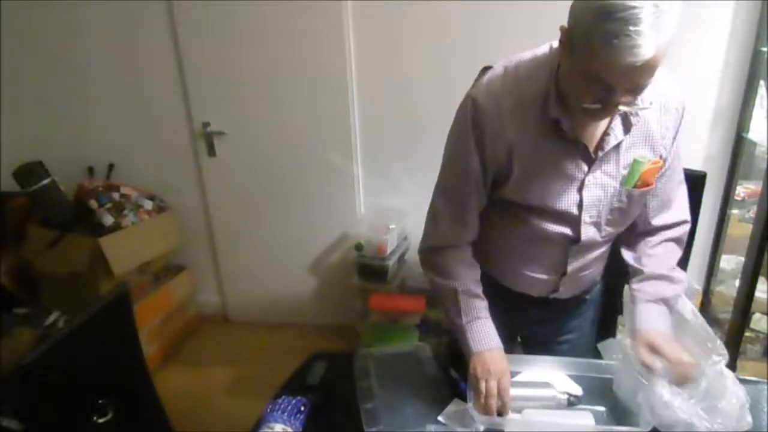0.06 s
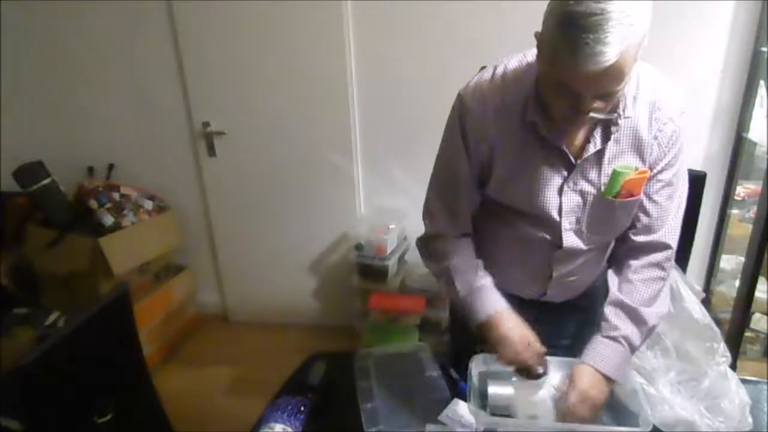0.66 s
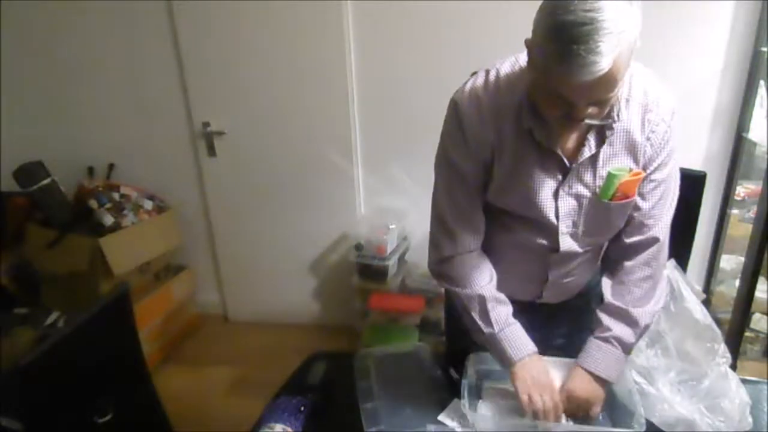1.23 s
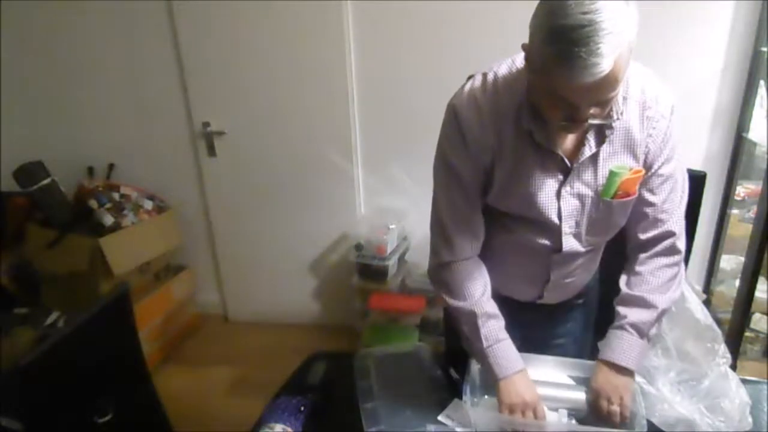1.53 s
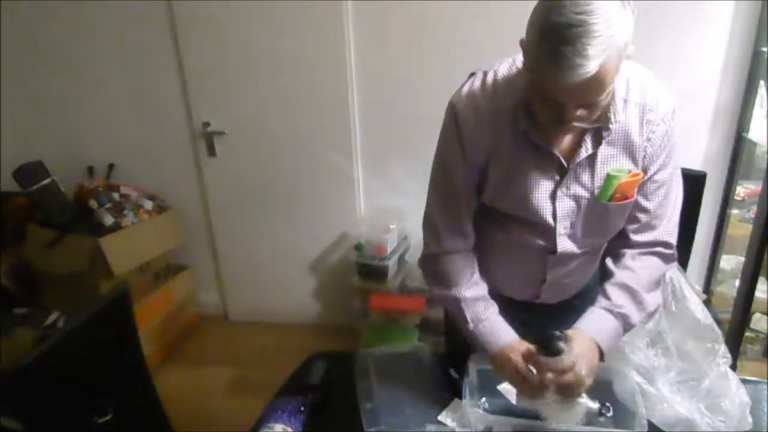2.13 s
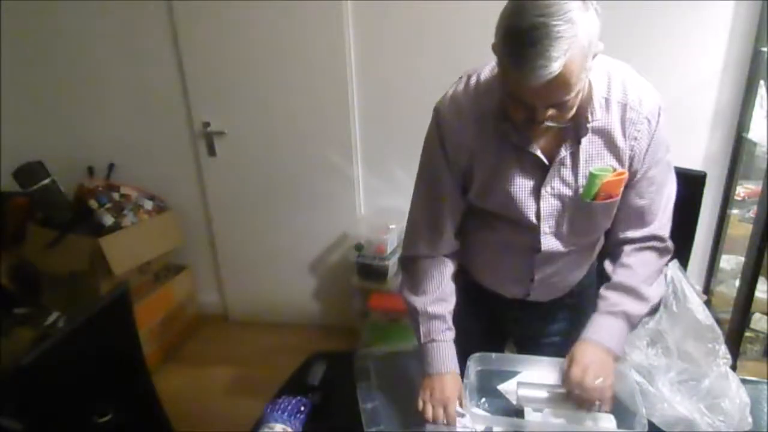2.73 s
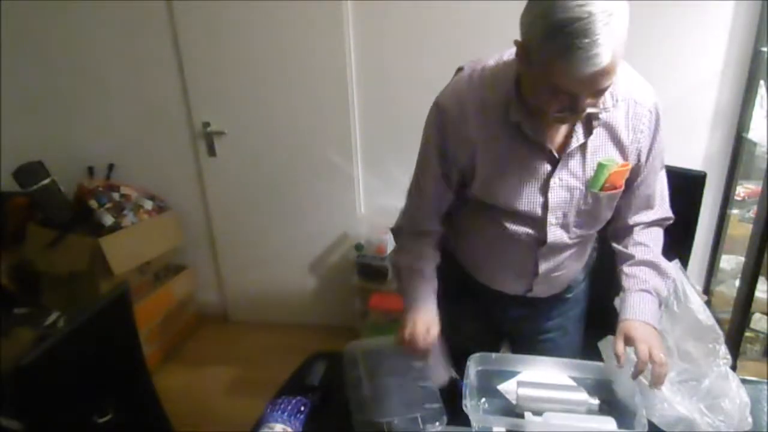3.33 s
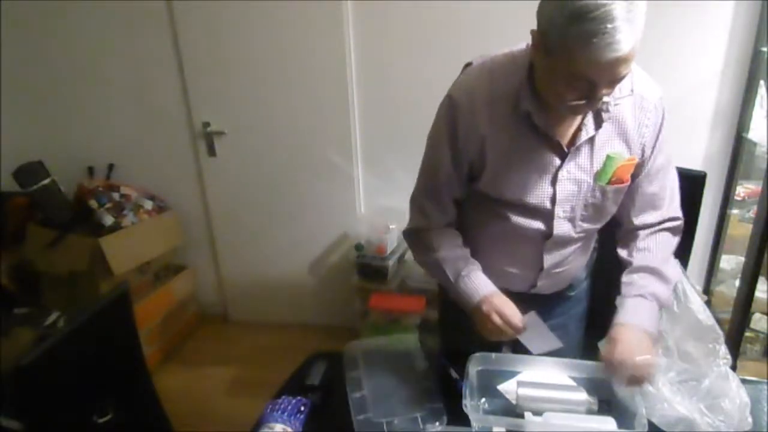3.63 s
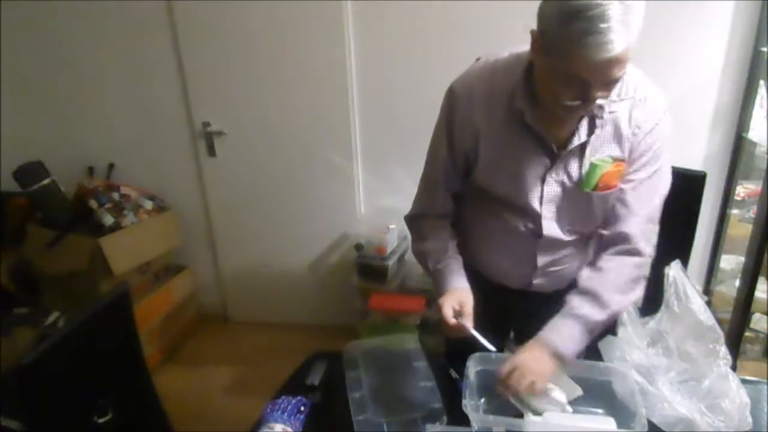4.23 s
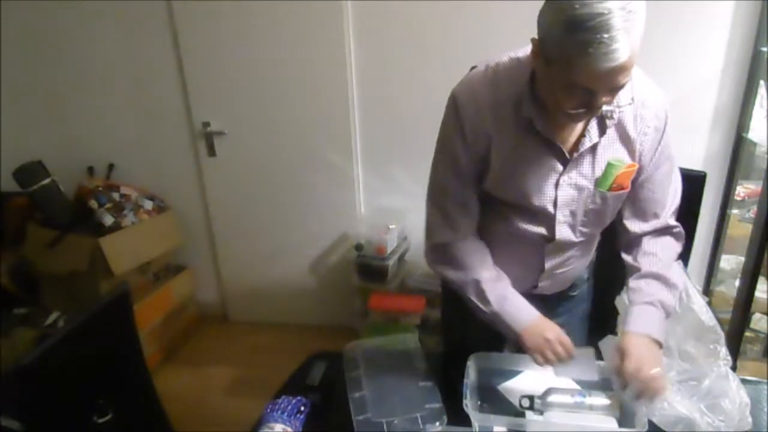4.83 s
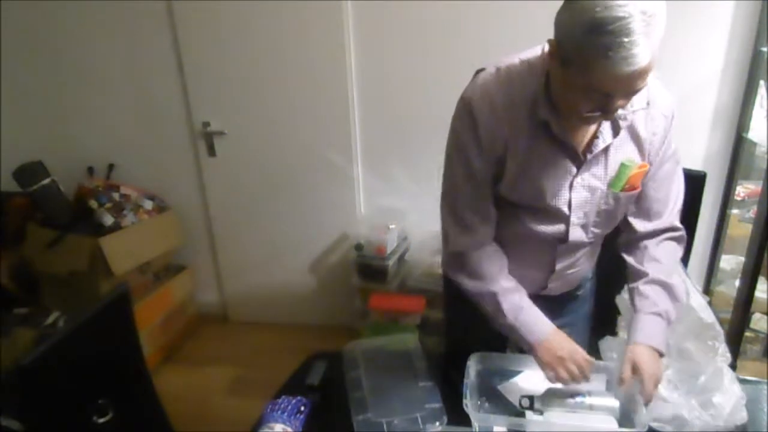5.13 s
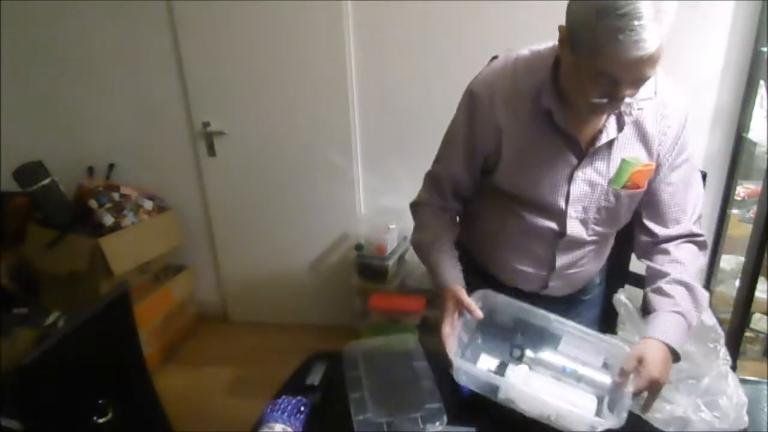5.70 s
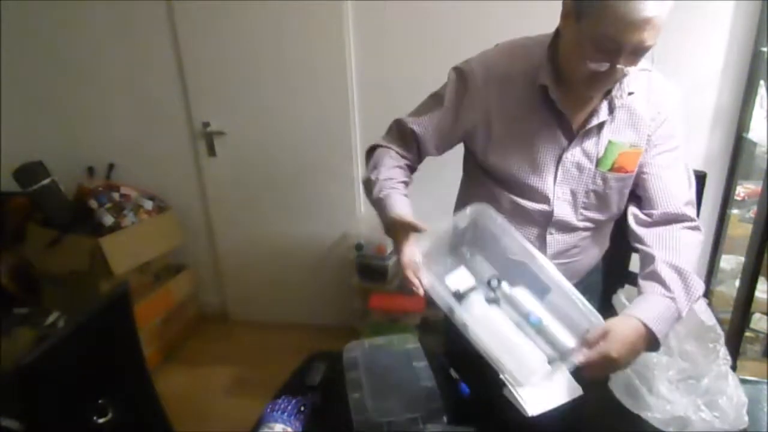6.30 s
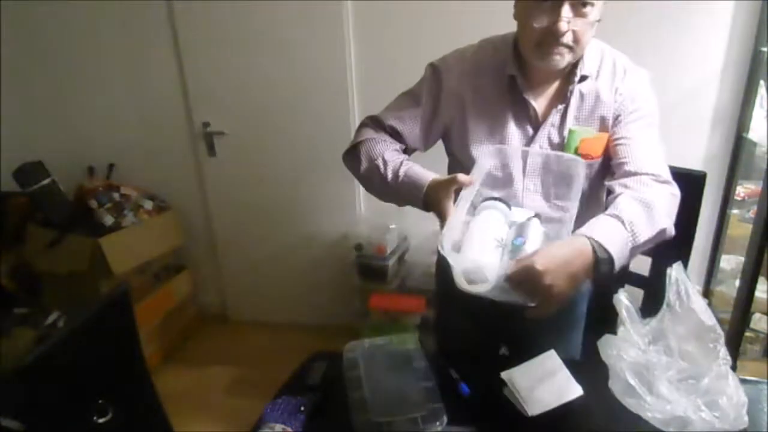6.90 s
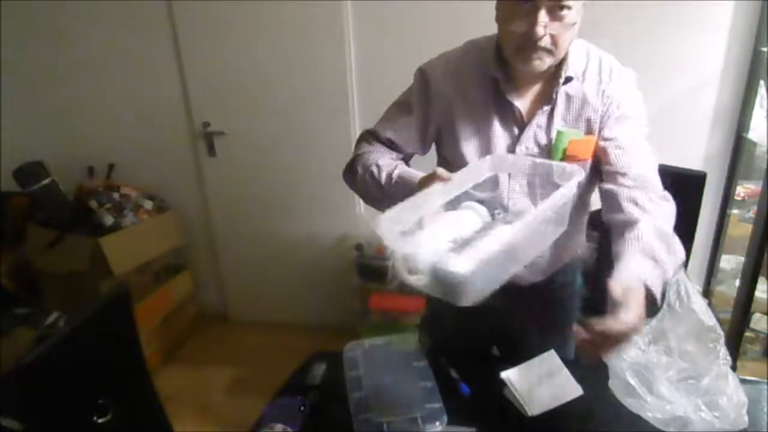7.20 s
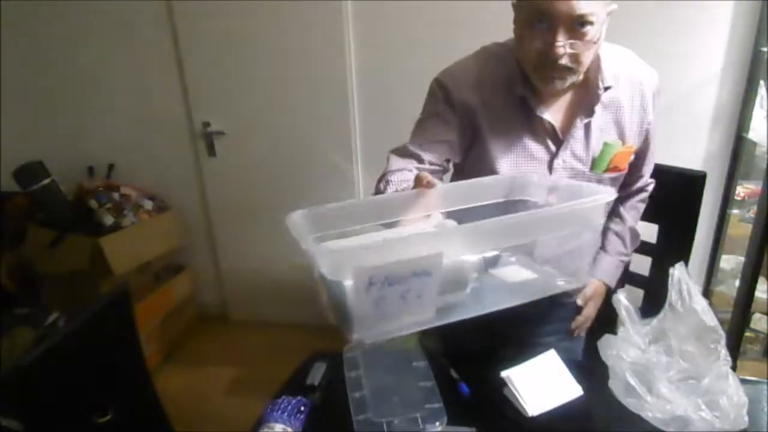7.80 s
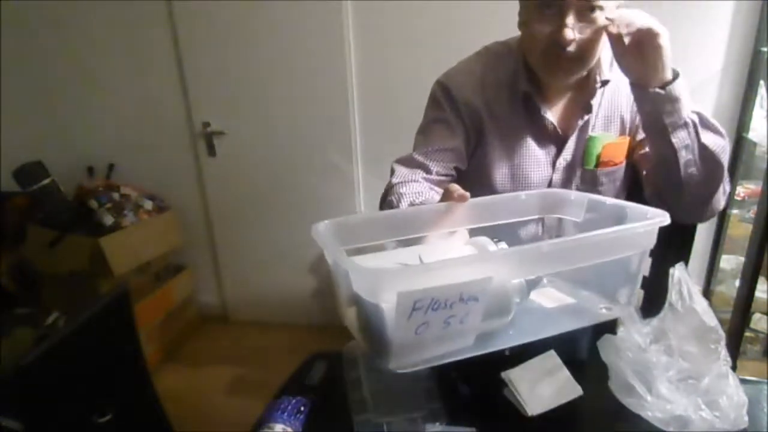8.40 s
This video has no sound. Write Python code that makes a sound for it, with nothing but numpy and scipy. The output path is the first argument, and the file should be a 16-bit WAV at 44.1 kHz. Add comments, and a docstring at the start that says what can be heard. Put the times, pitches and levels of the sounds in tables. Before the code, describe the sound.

In a small, hard-walled room, a thin plastic bag crinkles softly while bottles are put into a plastic storage box. Hollow knocks and clatters come in three main bursts, with small caps tinkling and a metal bottle ringing briefly. Then the load slides and taps lightly on the bottom as the box is lifted. The microphone is a couple of metres away, with a steady hiss and a faint whine.

```python
"""A small, hard-walled room, where bottles pass from a thin plastic bag into a plastic storage box.
Impacts excite the resonances of the box; a metal bottle and small caps ring in free vibration.
The bag and sleeves rustle in tiny snaps, friction drives narrow resonances, and the load slides
and taps the hollow floor as the box is lifted. Direct sound and reverberation reach one
narrow-band microphone a couple of metres away, over a steady hiss and a faint whine."""
import sys
import numpy as np
from scipy import signal
from scipy.fft import rfft, irfft, next_fast_len
from scipy.io import wavfile

SR = 44100
rng = np.random.default_rng(int(sys.argv[2]) if len(sys.argv) > 2 else 0)


def materialize(psi):
    """Save the field psi as 16-bit PCM at rate SR to the path in sys.argv[1].

    A 1-D psi becomes a single channel; in a 2-D psi each row is a channel.
    """
    bounded = np.clip(np.atleast_2d(psi).T, -1, 1)
    quanta = np.round(bounded * 32767).astype(np.int16)
    wavfile.write(sys.argv[1], SR, quanta)


N = 377052
TIME = np.arange(N) / SR


def from_db(db):
    """Amplitude ratio: a factor of ten for every 20 dB."""
    return 10 ** (np.asarray(db) / 20)


def unit_power(x):
    """Normalisation to a mean square of one."""
    return x / np.sqrt(np.mean(x ** 2) + 1e-20)


def add(out, start_s, sound):
    """Superposition: a sound adds to the mix from its starting time."""
    at = max(0, round(start_s * SR))
    out[at:at + len(sound)] += sound[:N - at]


def band(x, low_hz, high_hz):
    """Causal band-pass filtering."""
    return signal.sosfilt(signal.butter(2, [low_hz, high_hz], "band", fs=SR, output="sos"), x)


def coloured(x, spectrum):
    """Spectral shaping by a gain curve over log frequency, at unit power."""
    hz, db = np.transpose(spectrum)
    size = next_fast_len(N)
    bin_hz = np.maximum(np.arange(size // 2 + 1) * SR / size, 1)
    gain = from_db(np.interp(np.log(bin_hz), np.log(hz), db))
    return unit_power(irfft(rfft(x, size) * gain, size)[:N])


def drift(corner_hz):
    """Random modulation: low-passed noise of unit power."""
    hop, warm_up = 40, 2000
    pole = np.exp(-2 * np.pi * hop * corner_hz / SR)
    noise = rng.standard_normal(N // hop + warm_up + 2)
    slow = signal.lfilter([1], [1, -2 * pole, pole * pole], noise)[warm_up:]
    return np.interp(np.arange(N) / hop, np.arange(len(slow)), unit_power(slow))


def resonator(force, hz, width_hz):
    """Forced vibration of one damped mode, with unit gain at resonance."""
    radius = np.exp(-np.pi * width_hz / SR)
    feedback = [1, -2 * radius * np.cos(2 * np.pi * hz / SR), radius ** 2]
    return signal.lfilter(np.array([1, 0, -1]) * (1 - radius ** 2) / 2, feedback, force + 1e-18)


def ring(hz, t60):
    """Free vibration of one damped mode: a sinusoid that falls 60 dB in t60 seconds."""
    t = TIME[:SR // 2]
    return np.sin(2 * np.pi * hz * t) * from_db(-60 * t / t60)


# spectrum of the hiss: (frequency [Hz], spectral level [dB])
HISS_SPECTRUM = [(15, 9.5), (30, -2), (60, -1), (130, -6), (260, -6.5), (450, -6.5), (900, -6.5),
                 (1400, -3.5), (1900, -7), (4000, -9.5), (8000, -14.5)]

def hiss(level_db):
    """Stationary broadband noise, strongest at the lowest frequencies."""
    return from_db(level_db) * coloured(rng.standard_normal(N), HISS_SPECTRUM)


# envelope of the whine: (time [s], level [dB])
WHINE_LEVELS = [(0, -62.5), (3.3, -72), (3.7, -69), (6.1, -67), (6.4, -66), (8.2, -65.5), (8.55, -80)]

def whine(hz, waver_hz):
    """Random frequency and amplitude modulation make a thin tone waver."""
    times, levels = np.transpose(WHINE_LEVELS)
    pitch_hz = hz + waver_hz * (drift(2.0) + drift(64.4))
    level_db = np.interp(TIME, times, levels) + 2 * drift(17)
    return from_db(level_db) * np.sin(2 * np.pi * np.cumsum(pitch_hz) / SR)


# hand movements on bag, sleeves and load: (time [s], duration [s], crinkle [dB], sliding [dB])
STROKES = [(0.0, 0.062, -39, -40), (0.167, 0.082, -52, -54), (0.41, 0.13, -48, -49),
           (.65, 0.23, -48, -44.5), (1.695, .16, -55.5, -45), (1.84, 0.38, -48.5, -54),
           (2.134, 0.22, -44, -52), (2.758, .025, -44.5, -30.5), (2.989, 0.048, -48, -40),
           (3.081, 0.15, -49.5, -52.5), (3.825, 0.3, -49.5, -63), (3.869, 0.058, -61, -43.5),
           (4.428, 0.11, -63, -42), (5.062, 0.17, -43.5, -48.5), (5.22, 0.031, -42, -46),
           (5.381, 0.042, -48, -51), (5.661, 0.28, -56, -44), (6.49, 0.37, -60.5, -53),
           (7.004, 0.018, -45, -41.5), (7.091, 0.034, -65, -54), (7.395, 0.097, -46, -46.5),
           (7.641, 0.074, -49.5, -46.5), (7.75, .24, -56.5, -57), (8.034, 0.037, -50.5, -52.5)]

def handling(attack_s, release_s):
    """Incoherent sources add in power: strokes swell, hold and settle as crinkle and sliding gains."""
    crinkle_power = np.full(N, from_db(-59) ** 2)   # cloth and film stir between strokes
    slide_power = np.full(N, from_db(-71) ** 2)
    t = TIME[:SR]
    for start, duration, crinkle_db, slide_db in STROKES:
        swell_s = min(attack_s, max(start, .001))
        settling = np.exp(-np.maximum(t - swell_s - duration, 0) / release_s)
        envelope = np.minimum(t / swell_s, 1) * settling
        add(crinkle_power, start - swell_s, (from_db(crinkle_db) * envelope) ** 2)
        add(slide_power, start - swell_s, (from_db(slide_db) * envelope) ** 2)
    return np.sqrt(crinkle_power), np.sqrt(slide_power)


def impulses(per_s, spread_db):
    """A Poisson process with a drifting rate: snaps of uneven size come in clumps."""
    occurs = rng.random(N) < per_s * from_db(3 * drift(25)) / SR
    polarity = rng.choice([-1, 1], N)
    size = from_db(spread_db * np.minimum(rng.exponential(1, N), 4))
    return occurs * polarity * size


# spectra of creasing film and of sliding contact: (frequency [Hz], spectral level [dB])
CRINKLE_SPECTRUM = [(1200, -19.5), (2300, -4.5), (2700, 2), (3200, 0), (4000, 2), (4500, 3.5), (5200, 0),
                    (6500, 3), (8000, -3.5)]
SLIDE_SPECTRUM = [(100, -15), (350, -13), (550, 2.5), (850, -1), (1200, 0), (2200, 1), (3200, -4.5),
                  (8000, -37)]

def rustle():
    """Buckling and stick-slip: creases of the film snap; hands and bottles slip over the box."""
    crinkle_gain, slide_gain = handling(attack_s=.03, release_s=.047)
    snaps = impulses(per_s=2200, spread_db=-0.5)
    slips = box_walls(impulses(per_s=1200, spread_db=6.5), through_db=-0.5, modes_db=-5.0)
    film = crinkle_gain * from_db(-3.5) * coloured(snaps, CRINKLE_SPECTRUM)
    sliding = slide_gain * from_db(-14.5) * coloured(slips, SLIDE_SPECTRUM)
    return film + sliding


# resonances of the box walls: (frequency [Hz], bandwidth [Hz], relative level [dB])
WALL_MODES = [(225.8, 12, 0.5), (316, 2.7, -7.5), (492.5, 20, 3), (556, 10, -15.5), (681, 15, -7),
              (755, 38, -2.5), (935, 68, -6.5), (1286, 110, -7), (1558, 56, -4.5), (1737, 34, -5),
              (2224, 110, -8.5), (2638, 61, -0.5), (2900, 150, -11.5), (3730, 110, -5), (5095, 68, -3.5)]

def box_walls(force, through_db, modes_db):
    """Modal superposition: the walls transmit a force and ring at their own resonances."""
    modes = sum(from_db(modes_db + db) * resonator(force, hz, width) for hz, width, db in WALL_MODES)
    return from_db(through_db) * force + modes


# reverberant field: (frequency [Hz], level relative to the input [dB], decay time t60 [s])
ROOM_DECAY = [(60, 16, 0.46), (196, -1.5, 0.47), (523, 0, 0.35), (980, 1.5, 0.4), (2240, -0.5, 0.4),
              (4440, -3.5, 0.47), (7750, -4.5, 0.47)]

def reverberation(x, first_echo_s, build_s):
    """Convolution with dense wall reflections, which build up and decay exponentially in each band."""
    t = TIME[:round(.7 * SR)]
    hz, levels, t60s = np.transpose(ROOM_DECAY)
    edges_hz = np.geomspace(40, 10240, 17)
    noise = rng.standard_normal((2, len(t)))
    onset = np.clip((t - first_echo_s) / build_s, 0, 1)
    response = np.zeros(len(t))
    for k, (low, high) in enumerate(zip(edges_hz, edges_hz[1:])):
        log_centre = np.log(low * high) / 2
        t60 = np.interp(log_centre, np.log(hz), t60s)
        gain = from_db(np.interp(log_centre, np.log(hz), levels))
        echoes = band(noise[k % 2], low, high) * onset * from_db(-60 * t / t60)
        response += gain * echoes * np.sqrt(2 * (high - low) / SR / np.sum(echoes ** 2))
    return signal.fftconvolve(x, response)[:N]


# bottles and caps rubbing: (time [s], duration [s], level [dB], frequency [Hz], bandwidth [Hz])
RUB_EVENTS = [(.025, 0.03, -51, 950, 43), (0.473, 0.084, -46.5, 744, 70), (.61, 0.1, -51.5, 610, 70),
              (1.053, 0.07, -40, 566, 46), (1.33, 0.028, -23, 782, 17), (1.736, 0.014, -40.5, 3620, 400),
              (1.765, 0.32, -57, 2700, 90), (1.763, 0.3, -59.5, 4500, 300), (4.009, 0.17, -53, 1336, 42),
              (4.05, 0.17, -52.5, 780, 25), (4.499, 0.21, -54.5, 814, 56), (6.993, 0.067, -50.5, 2570, 360)]

def rubs():
    """Frictional excitation: each slip drives one resonance unevenly until the pressure falls away."""
    out = np.zeros(N)
    t = TIME[:SR]
    for start, duration, db, hz, width in RUB_EVENTS:
        pressure = np.clip(1 - (t / duration) ** 4, 0, 1)
        note = resonator(pressure * rng.standard_normal(len(t)), hz, width)
        add(out, start, from_db(db) * note * np.sqrt(np.sum(pressure) / np.sum(note ** 2)))
    return out


def scatter(envelope, count):
    """Phase dispersion: a wall spreads a blow in time but keeps its spectrum even; one row per blow."""
    size = 2 * len(envelope)
    spectrum = rfft(rng.standard_normal((count, len(envelope))) * envelope, size)
    return irfft(spectrum / (np.abs(spectrum) + 1e-9), size)[:, :len(envelope)]


def light_contacts(click_db, jostle_db, thud_db, bright_db):
    """Weak impacts: the click of each tap, and a bottle jostled at a random moment of each stroke."""
    clicks = [(start, db + click_db) for start, db, _, _ in FLOOR_TAPS]
    jostles = [(start + duration * rng.random(), slide_db + jostle_db)
               for start, duration, _, slide_db in STROKES]
    return [(start, db, thud_db, bright_db) for start, db in clicks + jostles]


# blows on the box; a heavy landing thuds, a hard edge is bright:
# (time [s], strength [dB], relative thud level [dB], relative brightness [dB])
BOX_IMPACTS = [(0.0663, -41.5, -21, 4), (0.1987, -44, -28, 0.5), (0.2686, -43, -37, -9),
               (0.4144, -41.5, -9.5, -11), (0.464, -32, -16, -5), (0.4935, -40.5, -18, -11),
               (0.5131, -40, -10.5, -1.5), (0.6237, -45.5, -32, 9), (0.8014, -24, -18, 2),
               (0.8899, -33, -23, -15.5), (1.0284, -39.5, -32, -5), (1.053, -26.5, -10.5, 3.5),
               (1.1802, -18, -37, -1.5), (1.1847, -18, -20.5, -1), (1.1961, -20, -27.5, 1),
               (1.2981, -20.5, -31, -4), (1.31, -21.5, -20, 2), (1.3166, -17, -28.5, -16),
               (1.3712, -27.5, -9.5, 3.5), (1.4183, -23, -26, -4.5), (1.5218, -32, -30, -5),
               (1.8885, -33, -19.5, -6), (2.476, -42, -32, -0.5), (2.4989, -31, -17, 1),
               (2.5173, -19, -29, -11), (2.5279, -30, -25, 3.5), (2.5569, -16, -17, -3.5),
               (2.5724, -12.5, -30, 1.5), (2.6939, -29.5, -38, -5.5), (2.7729, -35, -15, -10),
               (3.0101, -46.5, -11, 0), (3.3453, -51.5, -14, -2), (3.9574, -43.5, -16, 12.5),
               (4.015, -34, -19.5, -4.5), (4.2367, -42, -18, -2), (4.2659, -22.5, -46, -4.5),
               (4.5491, -22.5, -20.5, -4), (4.5803, -27.5, -35, -3), (4.6218, -23.5, -34, -6),
               (4.672, -27, -6, -1), (4.7052, -17.5, -18.5, -2), (4.841, -34.5, -13, -1),
               (4.8897, -38, -13, -1.5), (5.7003, -36.5, -16.5, -10), (5.709, -38, -28, 1),
               (5.8253, -38, -31, -3), (5.8839, -33.5, -14, -1.5), (6.0317, -45.5, -39, -18),
               (7.0135, -49.5, -31, -5), (7.117, -45, -11, -1), (8.4033, -58.5, -18, 13)]

def knocks(shell_t60, shell_db, spots):
    """Impact excitation: a crack and a buzz of crowded shell modes, with their wall reflections."""
    contacts = BOX_IMPACTS + light_contacts(click_db=-10, jostle_db=-6.5, thud_db=-24, bright_db=-0.5)
    starts, strength_db, thud_db, bright_db = np.transpose(contacts)
    # (lower edge [Hz], upper edge [Hz], t60 [s], relative level [dB]); stiff high modes die first
    registers = [(22, 64, .04, -46.5),   # the table under the box gives a little
                 (173, 430, .035, thud_db),
                 (503, 1350, .038, -4.5),   # the hollow middle register
                 (1100, 3080, .018, 0.013),
                 (3360, 7120, .015, bright_db)]
    t = TIME[:2048]
    reference_samples = round(.008 * SR)   # a crack has the energy of 8 ms at unit power
    blows = 0
    for low, high, t60, db in registers:
        envelope = from_db(-60 * t / t60) + from_db(shell_db - 60 * t / shell_t60)
        cracks = band(scatter(envelope, len(starts)), low, high)
        cracks /= np.sqrt(np.sum(cracks ** 2, axis=1, keepdims=True) / reference_samples)
        blows = blows + cracks * from_db(strength_db + db)[:, None]
    # softer blows are heard more by reflection than hard ones
    hard_blow_db = -14.5
    echo_db = 0.38 + np.clip(0.2 * (hard_blow_db - strength_db), 0, 2)
    direct, to_walls = np.zeros(N), np.zeros((spots, N))
    for k, (start, blow, db) in enumerate(zip(starts, blows, echo_db)):
        add(direct, start, blow)
        add(to_walls[k % spots], start, blow * from_db(db))
    # every spot in the box has its own pattern of reflections
    echoes = sum(reverberation(spot, first_echo_s=0.0005, build_s=0.0019) for spot in to_walls)
    return box_walls(direct + echoes, through_db=-5.0, modes_db=-3.5)


# struck caps, small containers and single notes of the metal bottle: (time [s], level [dB], frequency [Hz],
# decay time t60 [s])
TINKS = [(0.772, -30, 1786, 0.075), (0.771, -26, 3700, 0.014), (1.299, -17, 2280, 0.026),
         (1.316, -14.5, 2580, 0.047), (1.737, -33, 3600, 0.011), (2.5, -25, 3150, 0.038),
         (2.517, -23, 934, 0.084), (2.573, -41, 2240, .25), (2.575, -36, 915, 0.092),
         (4.269, -18.5, 1740, 0.039), (4.549, -19.5, 3550, 0.017), (4.705, -5.5, 5470, 0.0086)]

def tinks():
    """Simple damped oscillators: each struck object rings with one note."""
    out = np.zeros(N)
    for start, db, hz, t60 in TINKS:
        add(out, start, from_db(db) * ring(hz, t60))
    return out


# blows on the metal bottle: (time [s], level [dB])
BOTTLE_IMPACTS = [(1.3185, -36), (4.622, -39.5), (4.705, -26.5)]
# its modes: (frequency [Hz], relative level [dB], decay time t60 [s])
BOTTLE_MODES = [(236, -12.5, 0.2), (323, -14, 0.39), (1240, -11.5, 0.21), (1210, -13, 0.27),
                (1460, -27, 0.15), (1484, -5, 0.17), (2056, 3, 0.11), (2230, -6, 0.18), (2550, -1, 0.33),
                (2770, -6, .22), (3390, -8.5, 0.17), (3660, -27, .2), (4300, -5.5, 0.22),
                (4560, -25.5, .18), (4540, -2, .18)]

def metal_bottle(spread_db):
    """Free vibration of a metal shell: each blow excites a new mix of its inharmonic modes."""
    out = np.zeros(N)
    for start, db in BOTTLE_IMPACTS:
        for hz, mode_db, t60 in BOTTLE_MODES:
            level_db = db + mode_db + spread_db * rng.standard_normal()
            add(out, start, from_db(level_db) * ring(hz, t60))
    return out


# taps on the hollow floor of the box: (time [s], level [dB], frequency [Hz], decay time t60 [s])
FLOOR_TAPS = [(4.094, -44, 803, 0.057), (4.16, -40, 795, 0.04), (5.235, -35.5, 823, 0.056),
              (5.296, -41.5, 810, 0.038), (5.363, -41, 810, 0.045), (5.434, -41.5, 827, 0.053),
              (5.5, -40, 830, 0.021), (5.826, -35, 720, 0.13), (5.884, -34.5, 700, 0.071),
              (7.302, -40.5, 826, 0.059), (7.365, -41, 764, 0.048), (7.434, -37.5, 567, 0.09),
              (7.44, -39.5, 808, 0.12)]
# floor modes, relative to the tap's note: (frequency [ratio], level [dB], decay time [ratio])
FLOOR_MODES = [(.46, -26, 2.4), (.7, -23, 1.3), (1, -1.5, 1), (1.248, -15, 1.2), (1.8, -12, 1.1)]

def floor_taps():
    """Plate vibration: the floor answers fingers and shifting bottles with a short note."""
    out = np.zeros(N)
    for start, db, hz, t60 in FLOOR_TAPS:
        for hz_ratio, mode_db, t60_ratio in FLOOR_MODES:
            add(out, start, from_db(db + mode_db) * ring(hz * hz_ratio, t60 * t60_ratio))
    return out


def scene():
    """Superposition of direct and reverberant sound at one microphone."""
    knocking = knocks(shell_t60=0.06, shell_db=-13.0, spots=3)
    ringing = tinks() + metal_bottle(spread_db=2.5) + rubs() + floor_taps()
    rustling = rustle()
    echoes = reverberation(from_db(-7.0) * ringing + rustling, first_echo_s=0.00077, build_s=0.0039)
    background = whine(hz=1404, waver_hz=10) + hiss(level_db=-56)
    mono = knocking + ringing + rustling + echoes + background
    return np.array([mono, mono])


def record(dry):
    """Soft saturation rounds the highest peaks; a steep low-pass filter limits the bandwidth."""
    ceiling, cutoff_hz = .85, 7650
    rounded = dry / (1 + (dry / ceiling) ** 4) ** .25
    return signal.sosfilt(signal.ellip(9, .2, 65, cutoff_hz, fs=SR, output="sos"), rounded)


dry = scene()
out = record(dry)
materialize(out)
```